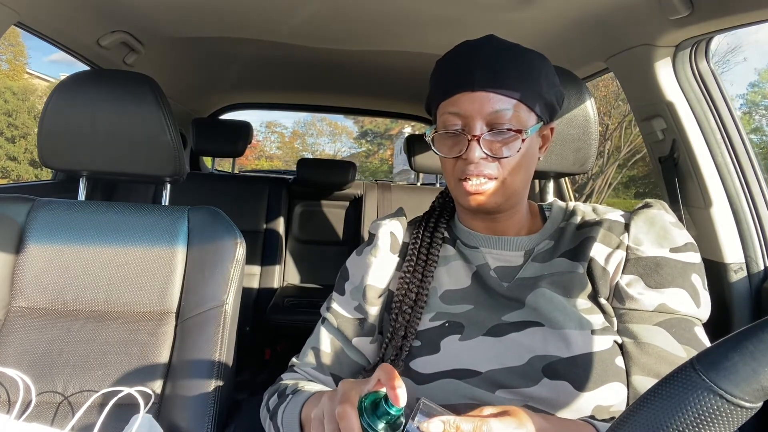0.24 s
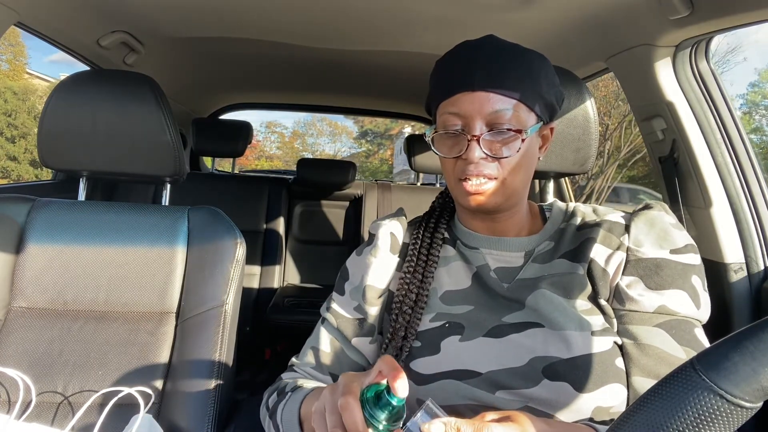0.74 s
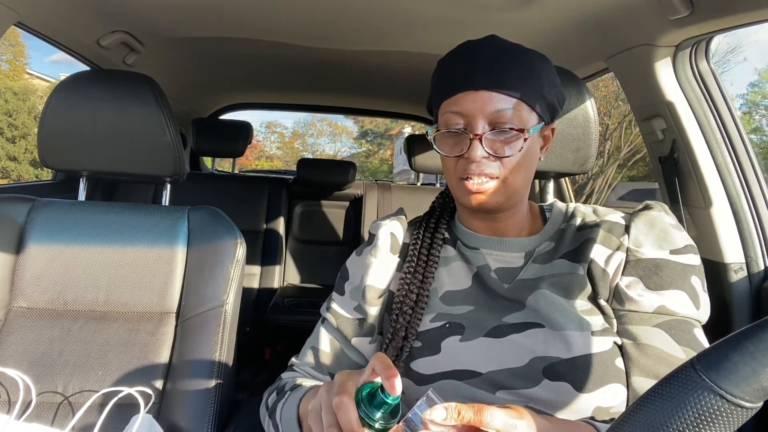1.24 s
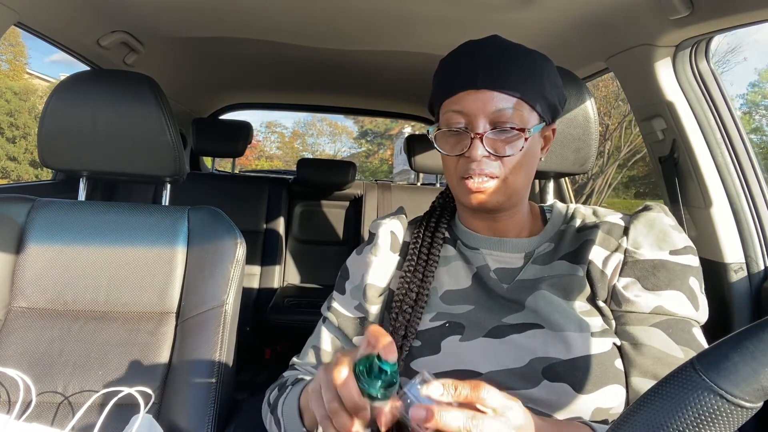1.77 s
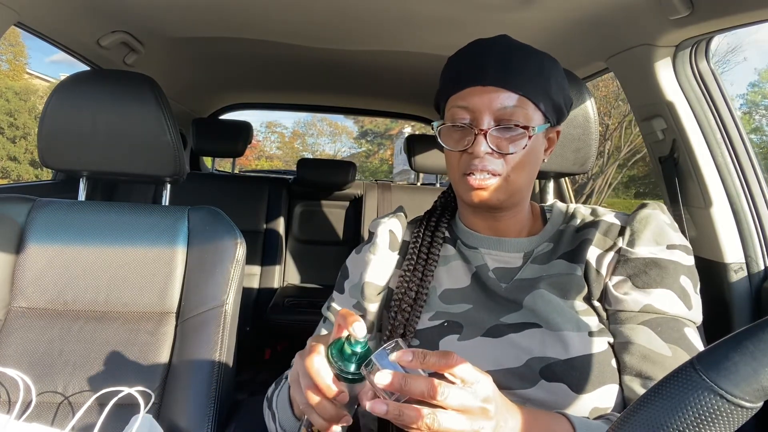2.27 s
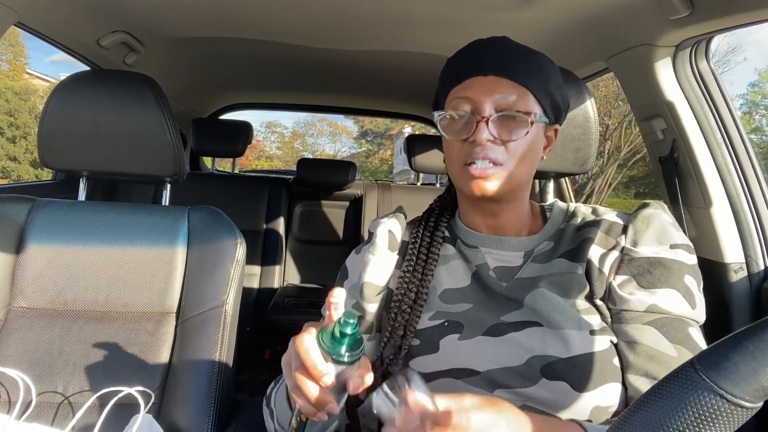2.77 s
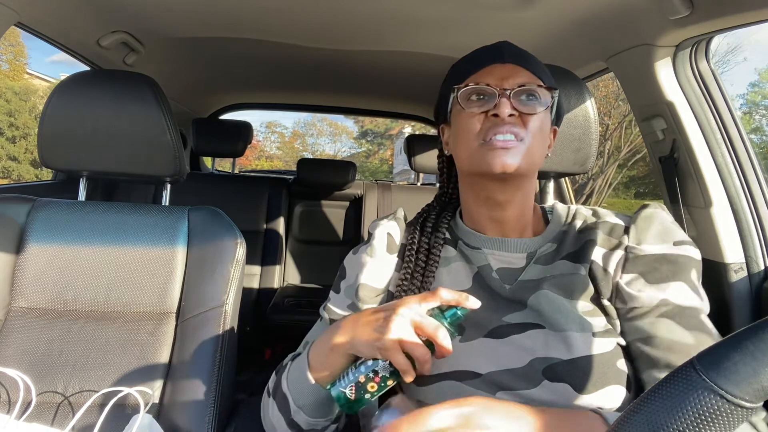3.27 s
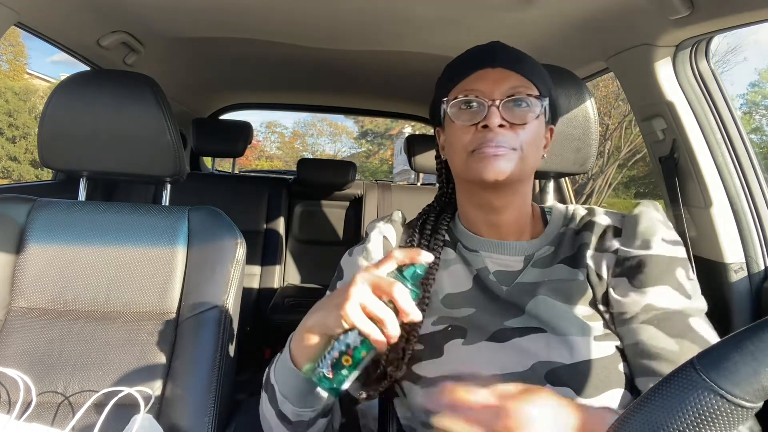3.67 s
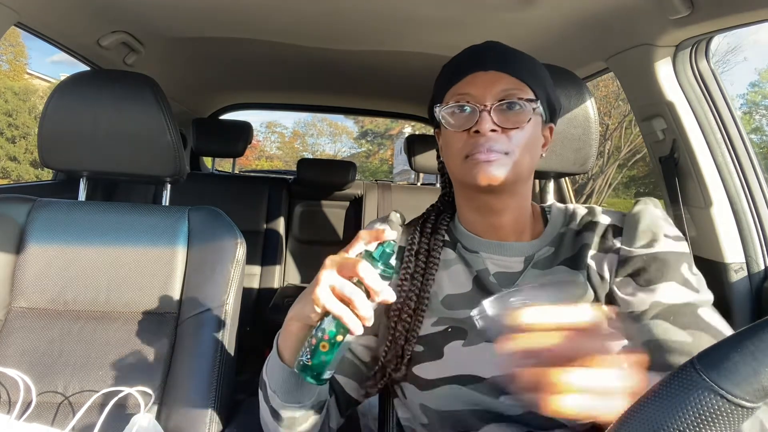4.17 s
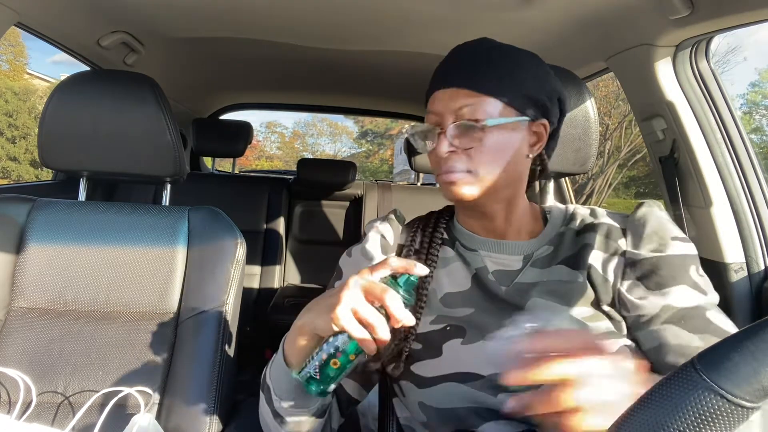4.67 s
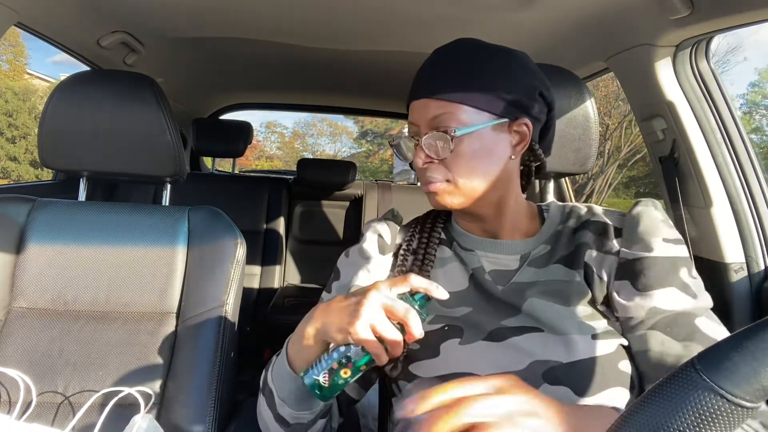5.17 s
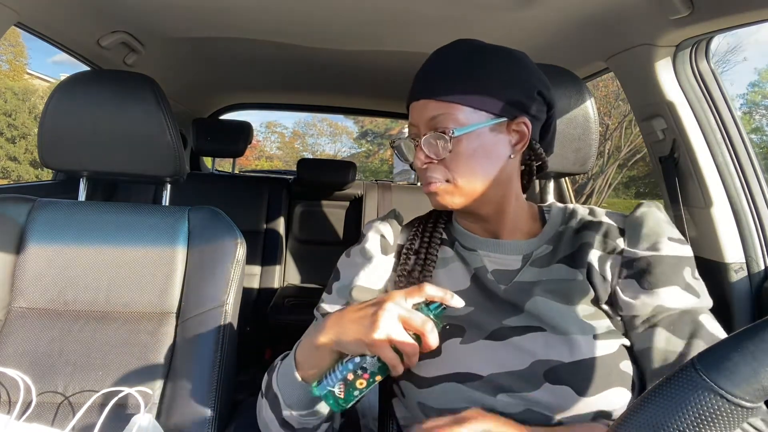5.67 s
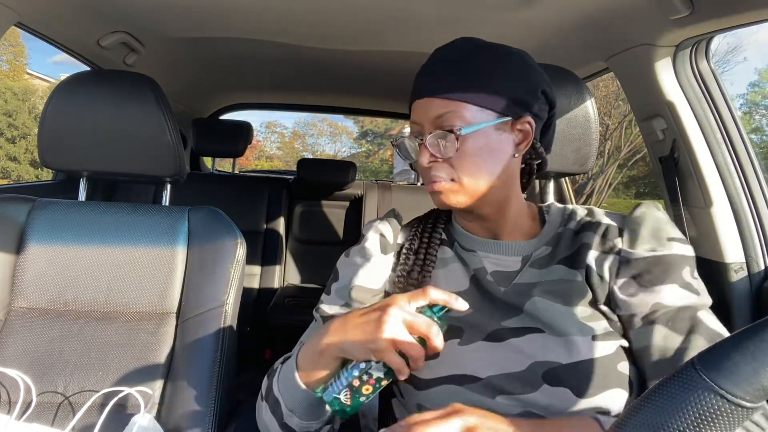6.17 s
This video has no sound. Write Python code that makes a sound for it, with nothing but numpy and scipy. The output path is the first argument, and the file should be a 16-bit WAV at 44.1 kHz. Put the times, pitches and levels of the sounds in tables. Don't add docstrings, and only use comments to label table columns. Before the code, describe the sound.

Rapid hollow plastic pump clicks, about four a second, give way to two brief mist sprays, then low engine hum, fan rumble and a late seat bump.

```python
import sys
import numpy as np
from scipy import signal
from scipy.fft import rfft, irfft, next_fast_len
from scipy.io import wavfile
from scipy.ndimage import uniform_filter1d

SR = 44100
rng = np.random.default_rng(int(sys.argv[2]) if len(sys.argv) > 2 else 0)


def generate_wav(sig):
    pcm = np.round(np.clip(np.atleast_2d(sig).T, -1, 1) * 32767).astype(np.int16)
    wavfile.write(sys.argv[1], SR, pcm)


def nominal_scale(level):
    x = np.asarray(level, float) / 20
    return 10 ** x


N = 283122
TIME = np.arange(N) / SR
FREQ = np.fft.rfftfreq(N, 1 / SR)

# time in seconds, pitch in Hz, level in dB.
ENGINE_HUM = [(0.0, 49.3, -36.5), (2.55, 49.1, -37.5), (2.67, 50.04, -31), (2.86, 51.95, -42),
              (3.04, 52.5, -29.5), (3.2, 49.84, -53), (3.25, 49.23, -40.5), (3.62, 48.62, -32.5),
              (3.73, 49.44, -53), (3.84, 48.92, -34), (4.33, 49.41, -32.5), (4.75, 48.53, -32.5),
              (5.0, 49.93, -31.5), (5.31, 48.89, -37), (5.67, 49.55, -33), (6.26, 48.3, -34),
              (6.31, 48.6, -27.5), (6.42, 47.2, -34.5)]
# start in seconds, level in dB, pitch in Hz, time to fade by 60 dB in seconds.
SEAT_BUMPS = [
    (6.2965, -14, 140, 0.048),
    (6.3135, -13.5, 108, 0.074),
    (4.35, -20.5, 172, 0.14),
    (5.8, -24, 88, 0.018),
    (6.416, -19, 52, .1),
]
# time in seconds, level in dB.
FAN_FLOW = [(0.0, -3), (1.5, -5.5), (2.0, -8), (2.6, -6.5), (3.05, -4), (3.4, -4.5), (4.5, -3), (5.5, -4.5),
            (6.42, -1)]
# frequency in Hz, level in dB per Hz.
ROAR_COLOUR = [(22, -18.5), (42, -12), (76, -4), (136, -8.5), (178, -7), (227, -12.5), (314, -11),
               (380, -25), (560, -28.5), (1250, -28), (1420, -38.5), (2100, -44.5), (2500, -43.5),
               (5000, -51.5), (6500, -64)]
# frequency in Hz, width in Hz, boost in dB.
DUCT_HUMPS = [(307, 51, -0.5), (435, 139, 11.5), (640, 130, 7), (812, 275, 8), (1157, 49, 5.5),
              (1600, 80, 5), (1952, 350, 10)]
# frequency in Hz, level in dB per Hz.
VENT_COLOUR = [(3000, 6.5), (6000, -1.5), (8600, -2.5), (12000, -6), (15500, -8)]
# start in seconds, valve level in dB, air level in dB.
CREAKS = [
    (5.0015, -70, -68.5),
    (5.236, -61, -69),
    (5.3894, -73, -73),
    (5.6594, -74, -71),
    (5.7842, -70, -70),
    (5.865, -67, -65),
    (6.2623, -57.5, -61),
]
# start in seconds, valve level in dB, air level in dB.
DRY_PUFFS = [(0.188, -66, -60), (0.2194, -63, -52.5), (0.4369, -67, -62.5), (0.4655, -61, -54.5),
             (0.6843, -79, -67), (0.7203, -60, -54), (0.9228, -65, -62), (0.96, -63, -55),
             (1.0799, -64, -68), (1.1662, -65, -66), (1.2067, -59, -54), (1.4012, -59, -67),
             (1.4421, -60, -55), (1.6397, -70, -82), (1.6636, -58, -68), (1.9325, -54, -68),
             (2.142, -62, -70), (2.5236, -64, -65), (2.3096, -73, -67.5), (2.4965, -64, -67),
             (2.549, -64, -68), (1.826, -66, -68)]
# frequency in Hz, level in dB per Hz.
VALVE_COLOUR = [(4200, -21), (5300, -8), (6400, -10), (7500, -9), (8250, -5), (8900, -10), (9800, -5.5),
                (11500, -31)]
# opening in seconds, fullest moment in seconds, fade in seconds, jet level in dB.
SPRAYS = [
    (1.986, 2.002, 0.039, -43),
    (2.355, 2.401, 0.069, -39.5),
]
# frequency in Hz, level in dB per Hz.
JET_COLOUR = [(1500, -24), (2400, -13.5), (3300, -6), (4200, -12.5), (5500, -17), (6500, -12), (7400, -17),
              (8700, -3.5), (10200, -10), (12000, -3.5), (14000, -3.5), (15600, -9.5)]
# frequency in Hz, level in dB, time to fade by 60 dB in seconds.
HEAD_MODES = [(2060, -6, 0.02), (2334, -10, .022), (2680, -8, 0.034), (2970, -5, 0.026), (3080, -9, 0.029),
              (3330, -8, 0.014), (3460, 0.5, 0.045), (3555, -4, 0.029), (3650, 0.5, 0.042),
              (3670, -9, 0.025), (3850, -5.5, .018), (4320, -16, 0.016), (4600, -19, .02),
              (9700, -17, 0.0094)]
# frequency in Hz, level in dB, time to fade by 60 dB in seconds.
WALL_MODES = [(1500, 1.5, 0.059), (1611, 3, 0.048), (1790, 3.5, .04), (1900, 2.5, 0.023),
              (2033, -0.5, 0.051), (2260, 4.5, 0.053), (2630, -12, 0.022)]
# start in seconds, then head, wall, valve and air in dB.
STROKES = [
    (0.05, -42.5, -39, -73, -69),
    (0.299, -36, -31, -59, -65),
    (0.5535, -35, -32, -58, -68),
    (0.801, -35, -30.5, -59, -68),
    (1.0467, -32.5, -35, -57, -72),
    (1.2927, -35, -35, -72, -86),
    (1.543, -31, -27, -67, -76),
    (2.1208, -40, -32, -68, -77),
]
# start in seconds, snap level in dB, wall level in dB, valve level in dB.
BOUNCES = [
    (0.09, -53, -30, -62),
    (0.339, -52, -27, -57.5),
    (0.5928, -48.5, -30.5, -70.5),
    (0.846, -52, -32, -71),
    (1.089, -50, -33, -66),
    (1.339, -54, -54, -85),
    (1.587, -47.5, -33, -60),
    (2.169, -52, -31.5, -57),
]
# start in seconds, peak in dB, pitch in Hz, valve level in dB.
CLACKS = [(0.1284, -23, 1620, -59), (0.414, -39, 1960, -60), (0.64, -31, 1620, -84),
          (0.873, -25, 1640, -55.5), (1.3802, -22.5, 1780, -55.5), (1.722, -45, 2050, -82),
          (1.8346, -40, 1500, -81), (2.309, -42, 1940, -64), (2.496, -32, 1620, -74),
          (2.551, -33, 1640, -79), (6.266, -36, 1700, -80)]
# start in seconds, peak in dB, pitch in Hz.
SNAPS = [(1.3802, -58, 3730), (1.8351, -47, 4060), (1.947, -55.5, 3250), (1.9958, -47.5, 4170),
         (2.1709, -47, 4300), (2.122, -45, 2440), (2.122, -45, 3220), (.418, -50, 2070),
         (2.497, -42.5, 2300), (2.497, -45.5, 3260), (2.497, -58, 4230), (2.5505, -52, 4300),
         (2.5505, -51, 2530), (2.5505, -54, 3400), (4.774, -57, 4000), (6.2631, -61, 5466)]
# frequency in Hz, left minus right in dB.
BOTTLE_PAN = [(1500, 2), (2400, 2), (3500, 1.5), (5000, -5.5), (8000, -0.5), (13000, -0.5)]
# frequency in Hz, likeness from 0 to 1, right's lead in radians, left minus right in dB.
PORTS = [(50, .95, 0, -.8), (150, .78, .1, -1.7), (500, .45, .3, -1.8), (1200, .45, .4, -1.6),
         (2400, .6, 1.2, -.3), (3800, .6, 1.8, -.5), (5500, .4, 2.8, -.5), (6500, .6, 1.2, -1),
         (7750, .97, 0, 0), (10350, .94, -3.14, 0), (12850, .95, -6.28, 0), (15500, .95, -9.42, 0)]

RUMBLE_DB, ROAR_DB, HISS_DB = -28.5, -31, -65.5
RUMBLE_FOLLOWS = 0.34
PUFF_T60_S, CREAK_T60_S, AIR_UNDER_VALVE_DB = 0.041, 0.069, -17
OPEN_S, OPENS_AT_DB, FADE_DB, FADE_BEND = 0.0018, -11, -17.5, 1.65
WALL_HZ, WALL_LAG_S, TRAVEL_S = 1520, .005, .0006
SNAP_HZ, SNAP_T60_S = 3650, .034
TICK_DB, TICK_T60_S = -25.5, .005
CABIN_T60_S, TREBLE_T60_S, CABIN_WET_DB = .065, .045, -10


def colour(x, points):
    hz, db = np.transpose(points)
    gain_db = np.interp(np.log(FREQ + 1), np.log(hz), db, left=-90, right=-90)
    return irfft(rfft(x) * nominal_scale(gain_db), N)


def unit(x):
    return x / np.sqrt(np.mean(x ** 2))


def walk(rate):
    hold = int(SR / rate)
    levels = np.repeat(rng.standard_normal(N // hold + 1), hold)
    return uniform_filter1d(uniform_filter1d(levels, hold), hold)[:N]


def decay(t, t60):
    return np.exp(-np.log(1000) * t / t60)


def add(out, s, x):
    i = int(s * SR)
    out[i:i + len(x)] += x[:N - i]


def ring(modes, chance, scatter_db):
    hz, db, t60 = np.array(modes).T[:, :, None]
    t = TIME[:SR // 5]
    sign = (-1) ** np.arange(len(hz))[:, None]
    strength = sign * nominal_scale(db + scatter_db * chance[:len(hz), None])
    x = (strength * decay(t, t60) * np.sin(2 * np.pi * hz * t)).sum(0)
    x = x * (1 - np.exp(-t / .0003))
    return x / np.abs(x).max()


def engine():
    s, hz, db = np.transpose(ENGINE_HUM)
    level = np.sqrt(2) * nominal_scale(np.interp(TIME, s, db) + 0.79 * walk(15))
    turns = np.cumsum(np.interp(TIME, s, hz)) / SR
    out = level * np.sin(2 * np.pi * turns)
    for s, db, hz, t60 in SEAT_BUMPS:
        add(out, s, -nominal_scale(db) * ring([(hz, 0, t60)], np.zeros(1), scatter_db=0))
    return out


def fan():
    flow_db = np.interp(TIME, *np.transpose(FAN_FLOW))
    humps_db = sum(db / (1 + (2 * (FREQ - hz) / width) ** 2) for hz, width, db in DUCT_HUMPS)
    roar = colour(rng.standard_normal(N), ROAR_COLOUR)
    roar = unit(irfft(rfft(roar) * nominal_scale(humps_db), N))
    low = signal.sosfilt(signal.butter(2, 400, fs=SR, output="sos"), roar)
    flutter_db = 1.2 * walk(7)
    hiss = nominal_scale(flutter_db) * unit(colour(rng.standard_normal(N), VENT_COLOUR))
    rumble = nominal_scale(RUMBLE_DB + RUMBLE_FOLLOWS * flow_db + 1.2 * walk(8.3)) * low
    return rumble + nominal_scale(ROAR_DB) * (roar - low) + nominal_scale(HISS_DB + flow_db) * hiss


def nozzle():
    valve, air, t = np.zeros(N), np.zeros(N), TIME[:SR // 5]
    ticks = DRY_PUFFS + [(s, valve_db, air_db) for s, _, _, valve_db, air_db in STROKES]
    ticks += [(s, db, db + AIR_UNDER_VALVE_DB) for s, _, _, db in CLACKS]
    ticks += [(s + WALL_LAG_S / 2, db, db + AIR_UNDER_VALVE_DB) for s, _, _, db in BOUNCES]
    for rows, t60 in ((ticks, PUFF_T60_S), (CREAKS, CREAK_T60_S)):
        fade = decay(t, t60)
        for s, valve_db, air_db in rows:
            add(valve, s, nominal_scale(valve_db) * fade ** 0.82 * (1 - np.exp(-t / 0.001)))
            add(air, s, nominal_scale(air_db) * fade * (1 - np.exp(-t / 0.002)))
    breath_colour = [(9000, -21.0), (10500, -12.0), (12200, -4.0), (14000, -10.0), (15700, -4.0)]
    rattle = unit(colour(rng.standard_normal(N), VALVE_COLOUR))
    breath = unit(colour(rng.standard_normal(N), breath_colour))
    return nominal_scale(2.5) * valve * rattle + nominal_scale(7.5) * air * breath


def mist():
    flow = 0
    for opens, full, fade, db in SPRAYS:
        swell_db = OPENS_AT_DB * np.clip((full - TIME) / (full - opens), 0, 1)
        fade_db = FADE_DB * (np.clip(TIME - full, 0, 1) / fade) ** FADE_BEND
        opening = np.clip((TIME - opens) / OPEN_S, 0, 1)
        flow = flow + opening * nominal_scale(db + swell_db + fade_db)
    sputter = nominal_scale(1.6 * walk(400) + 1)
    return flow * sputter * unit(colour(rng.standard_normal(N), JET_COLOUR))


def plunger():
    out, t = np.zeros(N), TIME[:SR // 10]
    for (s, db, *_), chance in zip(STROKES, rng.standard_normal((len(STROKES), len(HEAD_MODES)))):
        add(out, s + TRAVEL_S, nominal_scale(db + 6.5) * ring(HEAD_MODES, chance, scatter_db=2.5))

    clacks = [(s, db, WALL_HZ) for s, _, db, _, _ in STROKES] + [row[:3] for row in CLACKS]
    clacks += [(s + WALL_LAG_S, db, WALL_HZ) for s, _, db, _ in BOUNCES]
    for (s, db, hz), chance in zip(clacks, rng.standard_normal((len(clacks), 10))):
        wall = [(f, d - 25 * abs(np.log2(f / hz)), t60) for f, d, t60 in WALL_MODES]
        add(out, s + TRAVEL_S, nominal_scale(db - 5.5) * ring(wall, chance, scatter_db=2.5))
    for (s, db, _), noise in zip(clacks, rng.standard_normal((len(clacks), len(t)))):
        tick = uniform_filter1d(noise, size=4) * decay(t, TICK_T60_S)
        add(out, s + TRAVEL_S, nominal_scale(db + TICK_DB) * tick)

    snaps = SNAPS + [(s, db, SNAP_HZ) for s, db, _, _ in BOUNCES]
    snaps += [(s, db - 8, 3400) for s, db, *_ in STROKES]
    for (s, db, hz), noise in zip(snaps, rng.standard_normal((len(snaps), len(t)))):
        body = signal.iirpeak(hz, 3.6, fs=SR)
        rattle = signal.lfilter(*body, noise * decay(t, SNAP_T60_S))
        rattle = signal.lfilter(*body, rattle)
        add(out, s, nominal_scale(db + 10.0) * rattle / np.abs(rattle).max())
    return out


def cabin(x):
    t = TIME[:SR // 6]
    noise = rng.standard_normal(len(t)) * (t > .0015)
    dull = signal.sosfilt(signal.butter(2, 5000, fs=SR, output="sos"), noise)
    tail = dull * decay(t, CABIN_T60_S) + (noise - dull) * decay(t, TREBLE_T60_S)
    tail = tail / np.sqrt(np.sum(tail ** 2))
    return x + nominal_scale(CABIN_WET_DB) * signal.fftconvolve(x, tail)[:N]


def scene():
    air, other_air, hum = fan(), fan(), engine()
    bottle = plunger() + nozzle() + mist()
    like = np.interp(FREQ, *np.transpose(PORTS)[:2])
    right_air = irfft(like * rfft(air + hum) + np.sqrt(1 - like ** 2) * rfft(other_air), N)
    pan_db = np.interp(FREQ, *np.transpose(BOTTLE_PAN))
    near = rfft([cabin(bottle), cabin(bottle)]) * nominal_scale(np.outer([.5, -.5], pan_db))
    return irfft(near, N) + [air + hum, right_air]


def roll_off(x):
    return signal.sosfilt(signal.butter(12, 15720, fs=SR, output="sos"), x)


def record(dry):
    hz, *columns = np.transpose(PORTS)
    size = next_fast_len(N + SR // 10)
    bins_hz = np.fft.rfftfreq(size, 1 / SR)
    _, lead, pan_db = (np.interp(bins_hz, hz, column) for column in columns)
    left, right = rfft(dry, size)
    right = right * np.exp(1j * lead)
    mix = irfft([left * nominal_scale(pan_db / 2), right * nominal_scale(-pan_db / 2)], size)[:, :N]
    return roll_off(mix)


dry = scene()
out = record(dry)
generate_wav(out)
```